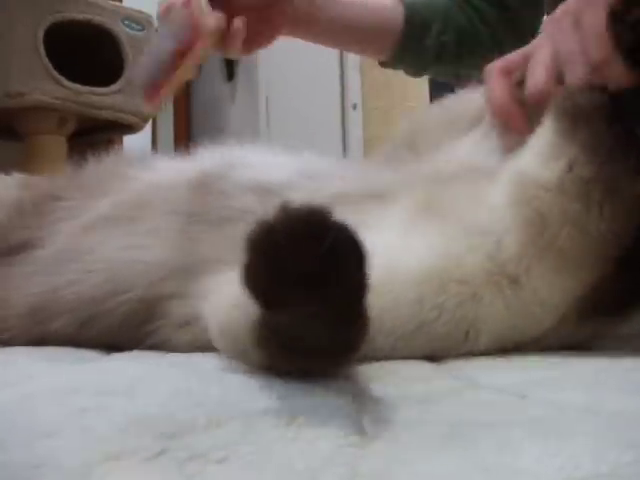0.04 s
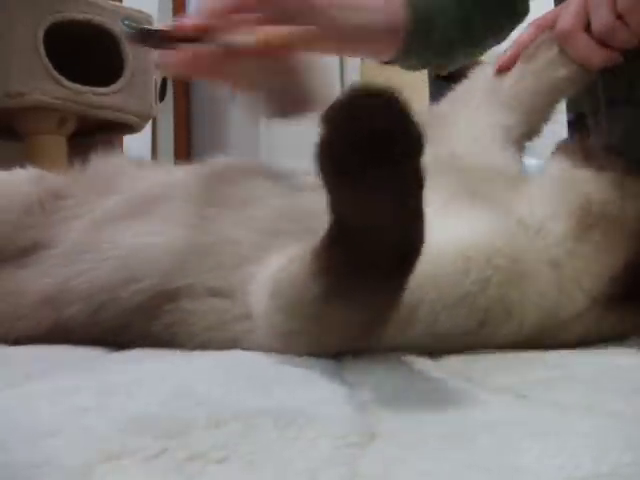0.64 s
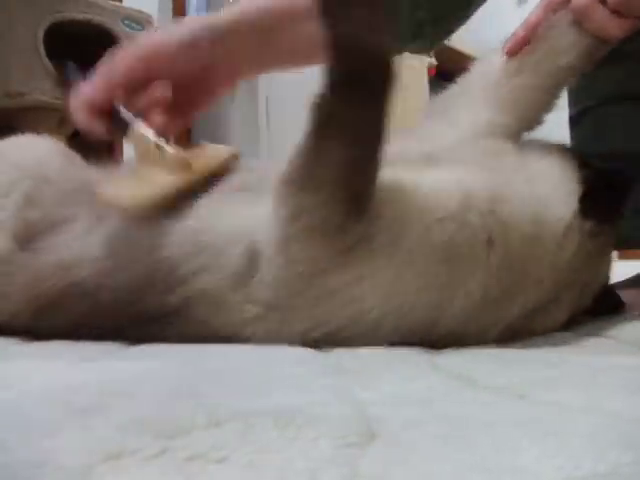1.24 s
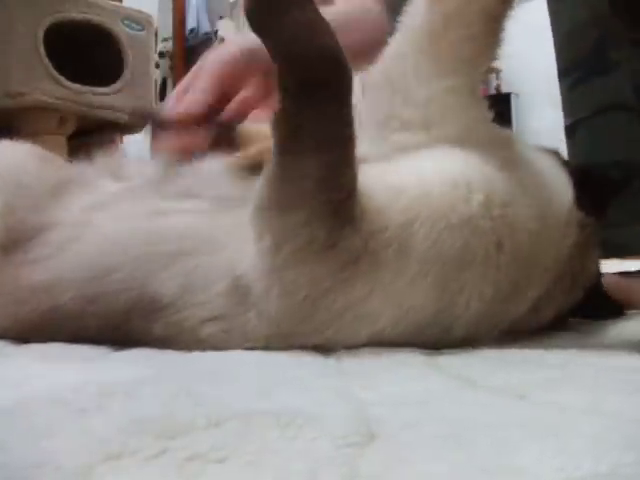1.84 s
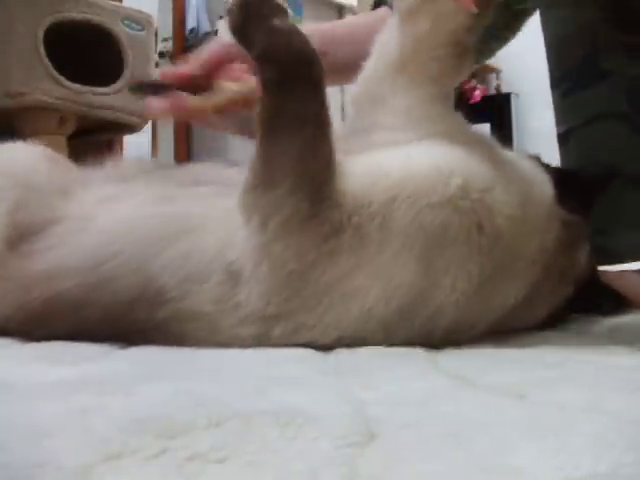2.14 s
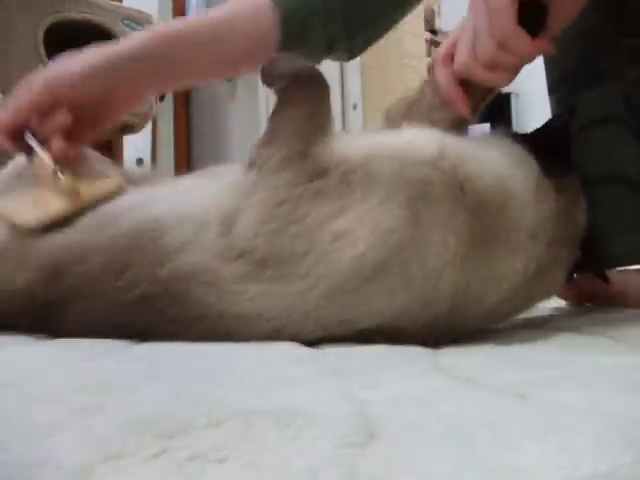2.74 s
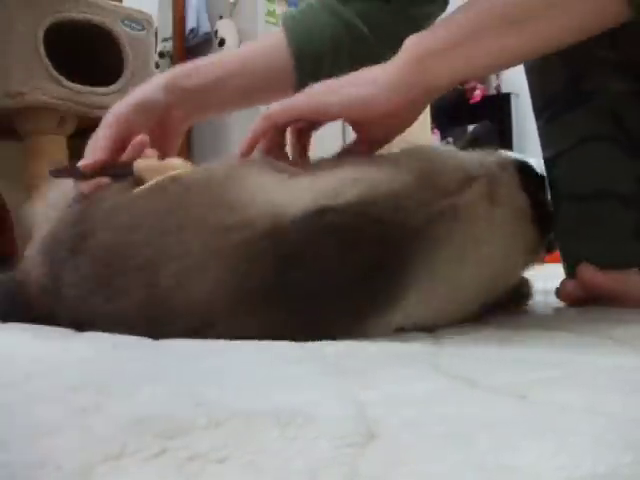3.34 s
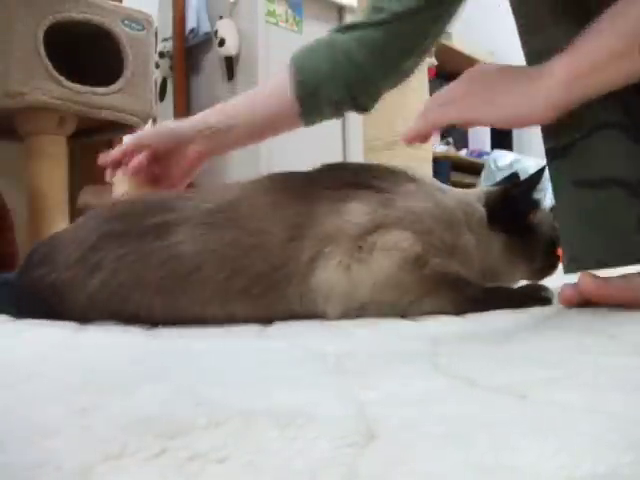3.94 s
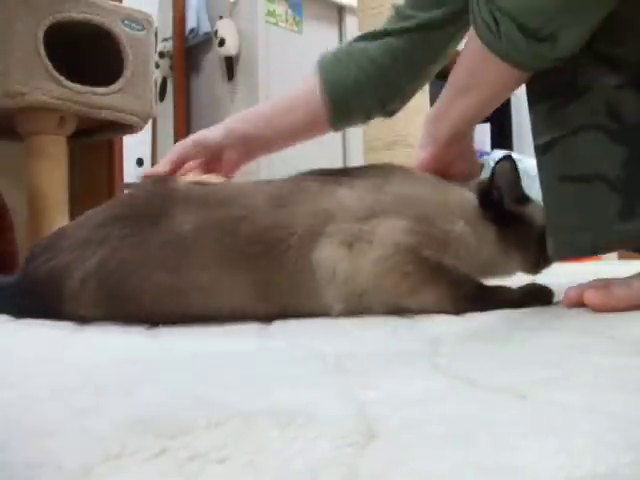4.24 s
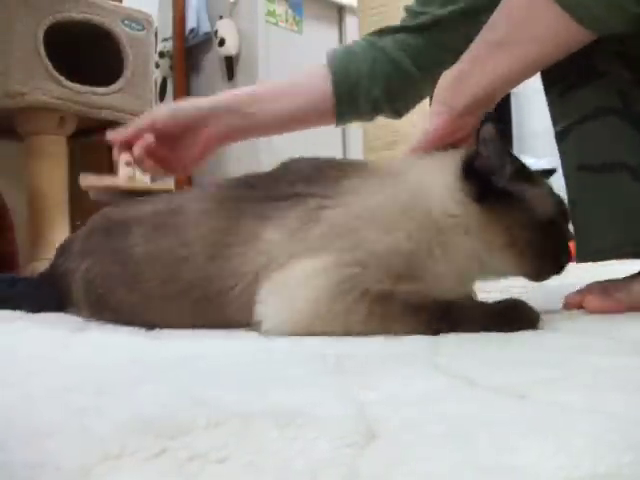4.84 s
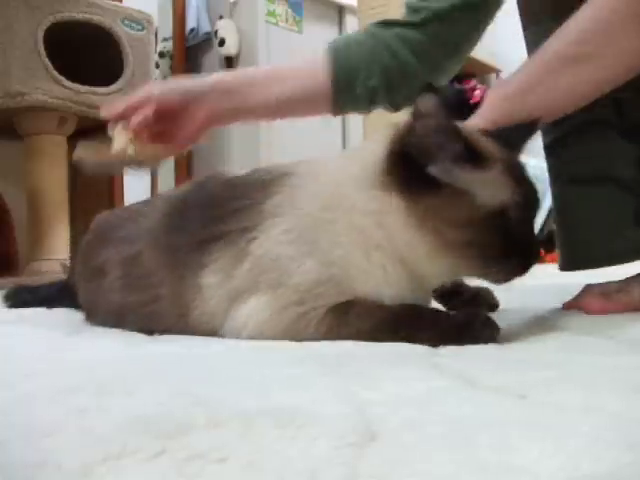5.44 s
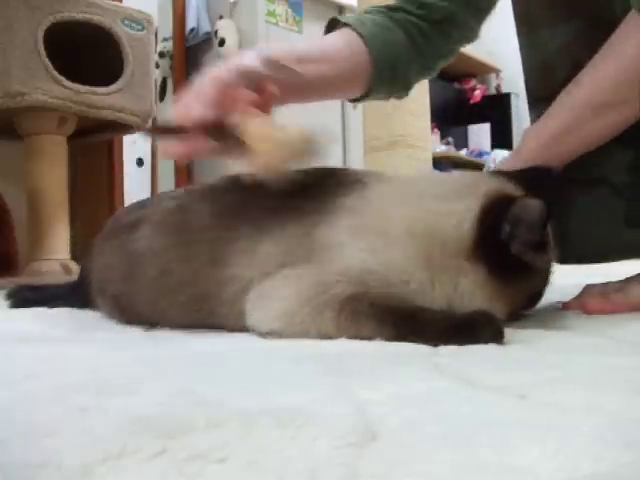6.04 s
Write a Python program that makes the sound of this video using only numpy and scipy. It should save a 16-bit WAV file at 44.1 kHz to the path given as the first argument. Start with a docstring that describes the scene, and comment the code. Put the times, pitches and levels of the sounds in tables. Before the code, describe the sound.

A brush sweeps through a cat's fur in short, soft, scratchy swishes, with a few light bumps over steady hiss.

```python
"""Brushing a cat

A wire-pin brush with a wooden back sweeps through a cat's fur, first on the belly, then, after the
cat rolls over, along its back. Pins snag and flick free of the hairs, shaking the brush's pad; now
and then the brush bumps softly. An appliance hums in the quiet room, and a coarse, low-rate
recorder turns the faint room noise into a steady hiss."""
import sys
import numpy as np
from scipy import signal
from scipy.fft import rfft, irfft, next_fast_len
from scipy.io import wavfile
from scipy.ndimage import map_coordinates

SR = 44100
rng = np.random.default_rng(int(sys.argv[2]) if len(sys.argv) > 2 else 0)


def persist_wave(psi):
    """Save psi, clipped to +-1, as 16-bit WAV."""
    counts = np.round(np.clip(psi, -1, 1) * 32767).astype(np.int16)
    wavfile.write(sys.argv[1], SR, np.atleast_2d(counts).T)


N = 273420
TIME = np.arange(N) / SR


def brush(rustle_db, hiss_db, tuft_db, roll_over_s):
    """Pins drag through the fur: the pad shakes, the fur rustles and the pin tips hiss."""
    # how the strokes ring low on the cat's belly and on its back: pitch_hz, width_hz, level_db
    pad_belly = [(377, 80, -8.5), (566.6, 89, 1), (715, 150, -6.5)]
    pad_back = [(418, 110, -8.5), (595, 130, 0), (744, 130, -3)]
    # rustle of the fur on the belly and on the back: pitch_hz, level_db
    fur_belly = [(450, -41), (720, -10.5), (860, -5.5), (1010, 1.5), (1190, -4), (1500, -5), (1900, -5.5),
                 (2400, -11.5), (2700, -18.5), (3050, -14.5), (4500, -39.5)]
    fur_back = [(450, -49), (720, -6.5), (900, -2), (1120, 1.5), (1330, -2.5), (1470, -4), (1790, -2.5),
                (2150, -3), (2550, -14.5), (3000, -12.5), (4500, -46.5)]
    # hairs sliding over the pin tips: pitch_hz, level_db
    pin_tips = [(1500, -40), (2500, -5.5), (2950, -3.5), (3600, -2.5), (4500, 0.5), (5200, -2.5),
                (5900, 1.5), (6800, -2), (8000, -4)]
    pad_gain, rustle_gain, hiss_gain, brightness = brush_strokes()
    pins = pin_flicks(per_second=3500, scatter_db=2.5, sliding=.7)
    on_belly = TIME < roll_over_s
    pad = np.where(on_belly, resonated(pins, pad_belly), resonated(pins, pad_back))
    rustle = np.where(on_belly, coloured(pins, fur_belly), coloured(pins, fur_back))
    rustle = tilted(rustle, brightness, split_hz=1400)
    hiss = coloured(pins, pin_tips)
    # thicker tufts pull harder on the pad, while the tips keep sliding evenly
    tufts = unit(amp(tuft_db * wobble(70)))
    tugging = tufts * (pad_gain * pad + amp(rustle_db) * rustle_gain * rustle)
    return tugging + amp(hiss_db) * hiss_gain * hiss


def pin_flicks(per_second, scatter_db, sliding):
    """Pins slip free in tiny clicks of random size, over the smooth noise of sliding."""
    slipping = rng.random(N) < per_second / SR
    clicks = slipping * rng.choice([-1, 1], N) * amp(scatter_db * rng.standard_normal(N))
    return unit(unit(clicks) + sliding * rng.standard_normal(N))


def brush_strokes():
    """The hand's strokes set how loud the pad, rustle and hiss are, and how bright the rustle is."""
    # one row per stroke; length is the time fully in the fur, dulling is brightness lost by digging in:
    # start_s, attack_s, length_s, pad_db, rustle_db, hiss_db, bright_db, dulling_db
    strokes = [(0.468, .06, .042, -57, -47, -46, 1, 3), (0.832, .022, .062, -49, -44, -49, 0, 7),
               (1.177, .04, .075, -50, -42, -49, 1, -1), (1.531, .05, .089, -46, -42, -47, -3, 0),
               (1.935, .02, 0.075, -46.5, -43.5, -47.5, -1.5, 6),
               (2.299, .025, .048, -44, -41, -43.5, -3.5, 0), (2.665, .035, .096, -48, -45, -50.5, -1, 4),
               (3.04, .07, .044, -49, -50, -56.5, -2, 1), (3.411, .035, 0.088, -65, -52.5, -59, -2, 7),
               (3.809, .055, .080, -50, -43, -48, 0.5, 1), (4.259, .04, .088, -60.5, -48.5, -54, 0, 4),
               (4.763, .045, 0.078, -55.5, -45.5, -50.5, 0, 5),
               (5.241, .05, .112, -53.5, -46.5, -52, 2.5, 0), (5.731, .05, .088, -50.5, -41.5, -47, 2, 1),
               (6.182, .03, 0.061, -53, -43, -50, 0.5, 2)]
    pad, rustle, hiss, brightness = np.zeros((4, N))
    for start, attack, length, pad_db, rustle_db, hiss_db, bright_db, dulling_db in strokes:
        # pins that dig in hard load the pad later and first catch the top hairs with a short scratch
        lag_s = .0024 * dulling_db
        catch_db = .6 * dulling_db * np.exp(-((TIME - start) / .012) ** 2)
        pad += amp(pad_db) * sweep(start + lag_s, attack, length, arch_db=1.5, lean_db=-.6)
        rustle += amp(rustle_db + catch_db) * sweep(start, attack, length, arch_db=1.47, lean_db=-1.5)
        hiss += amp(hiss_db) * sweep(start, attack, length, arch_db=2, lean_db=1.3)
        # the hand is fastest at mid-stroke, which brightens the rustle; sunken pins dull it
        progress = np.clip((TIME - start) / length, 0, 1)
        speed_db = 2 * (.5 - (2 * progress - 1) ** 2)
        colour_db = bright_db - dulling_db * (progress - .5) + speed_db
        brightness = np.where(TIME > start - 2 * attack, amp(colour_db), brightness)
    return pad, rustle, hiss, brightness


def sweep(start, attack, length, arch_db, lean_db, attack_db=20, lift_db_per_s=420):
    """Loudness of one stroke: pins sink in, speed up and slow, press more or less, then lift out."""
    t = TIME - start
    progress = np.clip(t / length, 0, 1)
    contact_db = attack_db * np.minimum(t / attack, 0) - lift_db_per_s * np.maximum(t - length, 0)
    return amp(contact_db - arch_db * (2 * progress - 1) ** 2 + lean_db * progress)


def bumps(knock_hz, thud_hz, knock_rise_s, thud_rise_s):
    """Fur cushions each bump: the pad swings a few times over a dull thud of the cat's body."""
    # soft bumps of the brush: start_s, knock_db, thud_db
    contacts = [(1.884, -36.5, -52.5), (2.252, -45, -56.5), (2.996, -42, -51), (3.011, -47.5, -64),
                (3.865, -40.5, -53)]
    out = np.zeros(N)
    for start, knock_db, thud_db in contacts:
        t = np.maximum(TIME - start, 0)
        for hz, rise, db in [(knock_hz, knock_rise_s, knock_db - 2.5), (thud_hz, thud_rise_s, thud_db + 4)]:
            swell = (t / rise) ** 2 * np.exp(2 - 2 * t / rise)
            out += amp(db) * swell * np.sin(2 * np.pi * hz * t)
    return out


def room_echo(x, fade_s, echo_db):
    """The small furnished room adds a brief echo that falls 60 dB in fade_s."""
    t = np.arange(SR // 4) / SR
    tail = rng.standard_normal(len(t)) * amp(-60 * t / fade_s) * (t > .003)
    return x + amp(echo_db) * signal.fftconvolve(x, tail / np.linalg.norm(tail))[:N]


def appliance_hum():
    """An appliance hums with a few slightly wavering tones."""
    # tones of the hum: pitch_hz, level_db, waver_hz
    tones = [(119.47, -72, 2.5), (326.1, -77, 4), (553.2, -76.5, 6), (770.2, -70.5, 2.6)]
    hum = np.zeros(N)
    for hz, db, waver_hz in tones:
        cycles = np.cumsum(hz + waver_hz * wobble(12)) / SR
        hum += amp(db) * np.sqrt(2) * np.sin(2 * np.pi * cycles)
    return hum


def room_air(air_db, drift_db):
    """Faint steady noise lies over a slow drift in air pressure."""
    # room air and microphone hiss: pitch_hz, level_db
    air = [(20, 2), (60, 0), (160, -0.5), (280, -1.5), (600, -1.5), (1000, -4.5), (2000, -8), (4000, -10),
           (8000, -12)]
    return amp(air_db) * coloured(rng.standard_normal(N), air) + amp(drift_db) * wobble(9)


def amp(db):
    """Turn decibels into a number to multiply by."""
    return 10 ** (np.asarray(db) / 20)


def unit(x):
    """Scale x to an average power of 1."""
    return x / np.sqrt(np.mean(x ** 2) + 1e-20)


def wobble(rate):
    """A smooth curve through random values, rate of them a second."""
    return map_coordinates(rng.standard_normal(int(N * rate / SR) + 4), [TIME * rate])


def filtered(x, response):
    """Multiply each frequency in x by response(hz)."""
    size = next_fast_len(N + 8192)
    return irfft(rfft(x, size) * response(np.fft.rfftfreq(size, 1 / SR)), size)[:N]


def coloured(x, points):
    """Shape x along a curve of (pitch_hz, level_db) points, at power 1."""
    hz, db = np.transpose(points)
    return unit(filtered(x, lambda f: amp(np.interp(np.log(f + 1), np.log(hz), db))))


def resonated(x, rings):
    """Make x ring at each (pitch_hz, width_hz, level_db) row, at power 1."""
    def response(f):
        return sum((-1) ** k * amp(db) * 1j * f * width / (hz * hz - f * f + 1j * f * width)
                   for k, (hz, width, db) in enumerate(rings))
    return unit(filtered(x, response))


def tilted(x, brightness, split_hz):
    """Balance the highs of x against its lows, keeping the power steady."""
    low = filtered(x, lambda f: 1 / (1 + (f / split_hz) ** 10))
    return (unit(low) + brightness * unit(x - low)) / np.hypot(1, brightness)


def scene():
    """Brush strokes and bumps close by, in a quiet room."""
    brushing = brush(rustle_db=-.54, hiss_db=2.26, tuft_db=.77, roll_over_s=3.25)
    knocks = bumps(knock_hz=579, thud_hz=145.3, knock_rise_s=.0034, thud_rise_s=.005)
    grooming = room_echo(brushing + knocks, fade_s=.07, echo_db=-16)
    return (grooming + appliance_hum() + room_air(air_db=-55.5, drift_db=-77))[None]


def record(dry):
    """A low-rate recorder rounds down to coarse steps; in pauses it flips between two, which hisses."""
    rate_hz, step, top_hz = 16000, .0055, 9050
    treble_cut = signal.firwin(28225, rate_hz / 2, fs=160 * SR)
    samples = signal.resample_poly(dry[0], rate_hz // 100, SR // 100, window=treble_cut)
    stepped = step * np.floor(samples / step + .075)
    smoothing = signal.firwin(14113, rate_hz / 2, window=("kaiser", 9), fs=160 * SR)
    played = signal.resample_poly(stepped, SR // 100, rate_hz // 100, window=smoothing)
    return filtered(played[:N], lambda hz: hz < top_hz)[None]


dry = scene()
out = record(dry)
persist_wave(out)
```